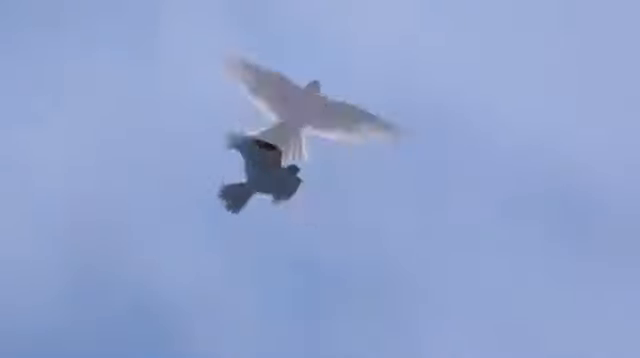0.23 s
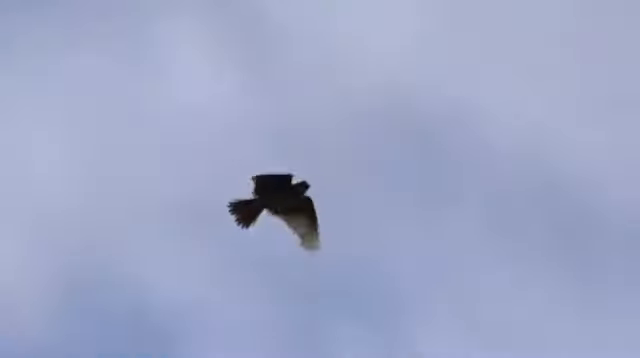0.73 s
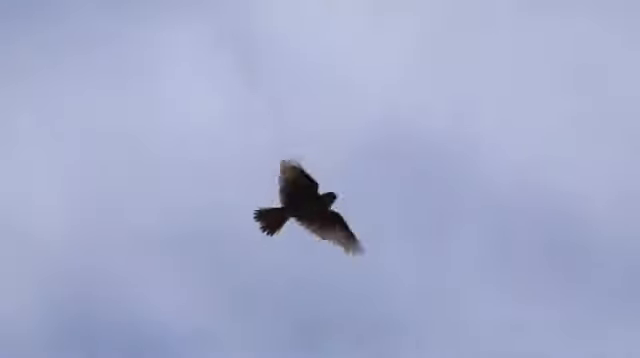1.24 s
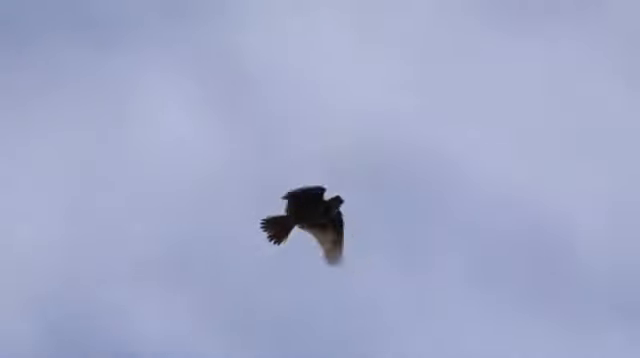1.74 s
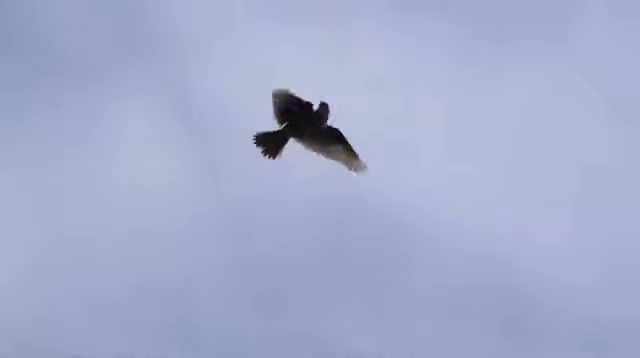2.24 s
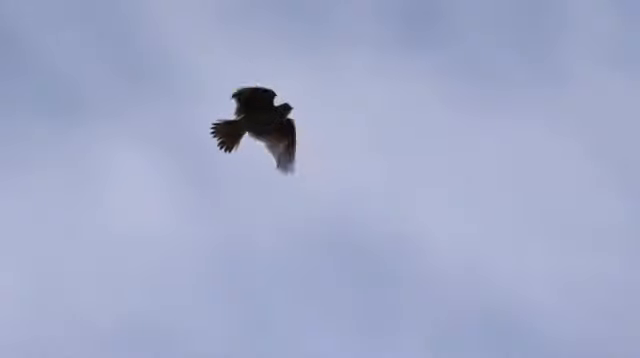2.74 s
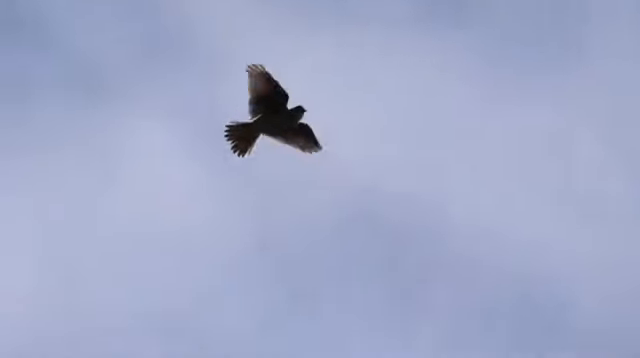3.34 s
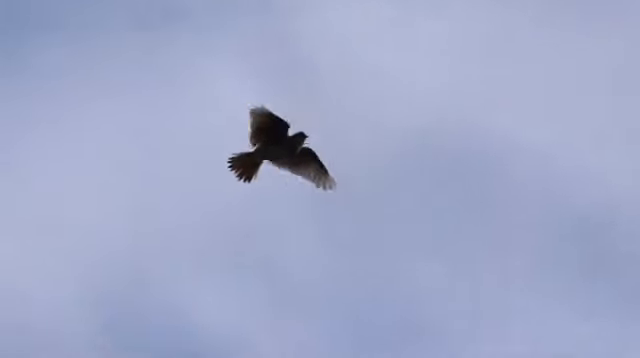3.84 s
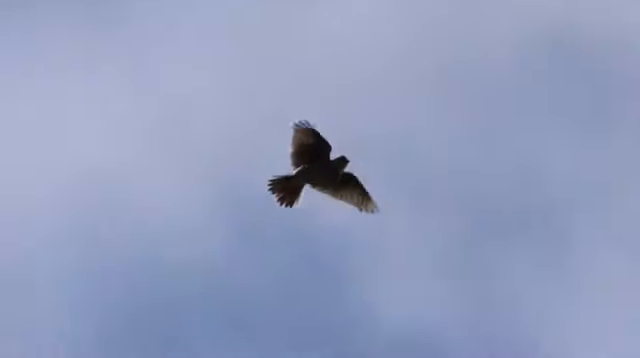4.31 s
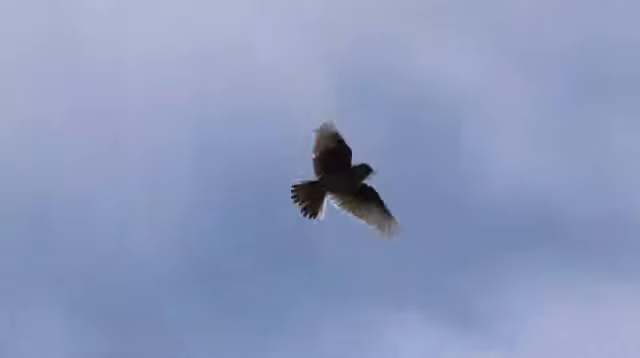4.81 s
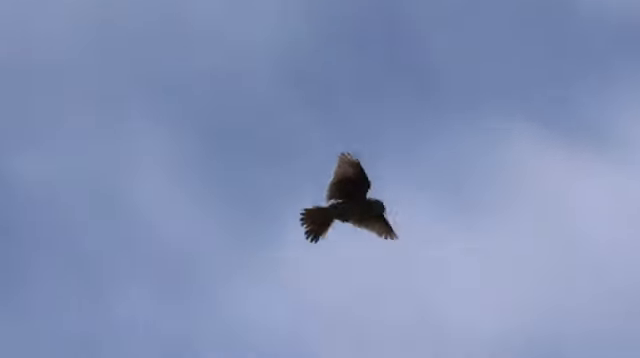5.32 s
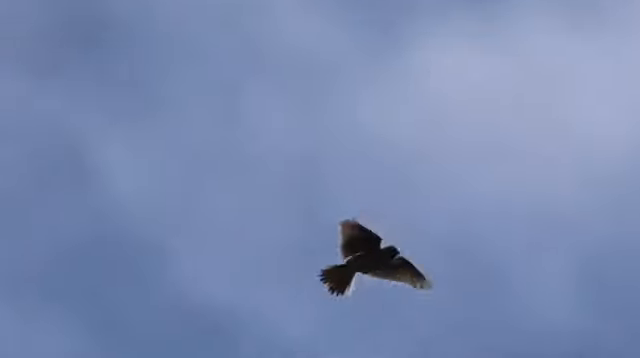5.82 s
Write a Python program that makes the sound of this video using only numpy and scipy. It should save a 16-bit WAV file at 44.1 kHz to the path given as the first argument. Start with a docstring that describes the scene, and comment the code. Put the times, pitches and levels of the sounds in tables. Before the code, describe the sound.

Outdoors over grassland, a nearby lark pours out high, clear song, with a fading blur of distant larks behind it. Repeated whistles give way to chips, warbles and two rapid trills, each on one repeated syllable and trailed by a light airy wash. The highest notes briefly turn gritty. Soft gusts rumble on the microphone, mostly at the beginning and end, above a faint hiss.

```python
"""A lark sings in flight over grassland: pure whistles, trills of one repeated syllable, quick chips and
warbles. Other larks sing farther off. Each note is a gliding, near-pure tone from the syrinx, echoed by
the ground. The tones' level wavers, a noisy wash surrounds and trails the trills, and now and then the
highest tones briefly turn to gritty noise. Wind buffets the microphone over a faint hiss; one dry tick."""
import sys
import numpy as np
from scipy import signal
from scipy.io import wavfile
from scipy.ndimage import uniform_filter1d

SR = 44100
rng = np.random.default_rng(int(sys.argv[2]) if len(sys.argv) > 2 else 0)


def int16_out(signal):
    """Quantize to a 16-bit WAV file."""
    q = np.round(np.clip(np.atleast_2d(signal).T, -1, 1) * 32767)
    wavfile.write(sys.argv[1], SR, q.astype(np.int16))


N = 267687

# syllable shapes named in the trill table: (time [ms], pitch [Hz], level [dB])
FALL = [(0, 4950, -20), (8, 4700, -13), (16.84, 4620, -7.5), (21.1, 5600, -7), (22.4, 5900, -15),
        (26.52, 5750, -27), (29.43, 4500, -2), (32.3, 3950, 2), (44.1, 2780, -11.5), (49, 2480, -29)]
PAIR = [(0, 3650, -22), (3, 3950, 1.5), (6.5, 4200, -16.5), (7.5, 3220, -12), (11, 4070, -1),
        (15, 4030, -20)]
BOW = [(0, 3450, -20), (4.5, 3720, -5), (16, 3900, -2.5), (29, 3650, -1.5), (39, 3220, -3), (46, 2700, -6),
       (53, 2080, -18)]
TURN = [(0, 5350, -26), (2, 5050, -.5), (8, 5300, -3), (11, 5350, -18), (13, 4750, -2), (16.5, 4380, -1),
        (21, 4250, -26)]


def lark_notes():
    """The near lark's whistles, slurs, warbles, chips and hooks; a noisy halo surrounds the hooks."""
    # one contour per whistle: (time [s], pitch [Hz], level [dB])
    whistles = [
        [(2.047, 2620, -23), (2.053, 2664, -26), (2.1255, 2512, -29), (2.1425, 2070, -33), (2.1575, 1630, -56)],
        [(4.249, 3000, -36), (4.256, 3130, -24), (4.2665, 3400, -19), (4.2785, 4100, -21.5),
         (4.295, 4355, -19.5), (4.387, 4702, -22.5), (4.41, 4655, -32)],
        [(5.662, 4750, -54), (5.667, 4616, -24), (5.6825, 4740, -26), (5.6855, 4420, -21), (5.69, 3426, -31),
         (5.6995, 3810.0, -23.5), (5.7035, 4150, -26), (5.7085, 2860, -30)],
    ]
    # (start [s], length [ms], first [dB], last [dB], rise [ms], fade [ms],
    # first [Hz], bend at [ms], bend [Hz], last [Hz])
    slurs = [(1.943, 30, -30, -28, 2, 3, 3250, 9, 4280, 4450),
             (1.941, 27, -50, -27.5, 1, 1, 2000, 14, 2800, 2915),
             (1.973, 72, -21, -20.5, 3, 29, 3640, 44, 3595, 3300),
             (2.377, 19, -27, -22, 6, 1, 3000, 12, 3620, 3300),
             (3.625, 20.5, -28, -29, 2, 5, 4430, 15.5, 5750, 6400),
             (3.664, 31, -33, -19.5, 3, 4.5, 5270, 26, 4910, 4850),
             (3.99, 33.5, -29, -19.5, 2, 4, 5590, 21.5, 5060, 4900),
             (5.716, 19, -27, -18, 8, 4.5, 2840, 10, 3900, 4050),
             (5.738, 18.5, -22, -21, 3, 3.5, 5000, 2.5, 4650, 4445),
             (5.76, 19, -19.5, -21, 2.5, 9, 5050, 3.5, 4510, 4450)]
    # (beat, carrier), columns as in warble()
    warbles = [ ((2.466, 44, 12, .01, .33, .05), [(2.413, 4900, -36), (2.418, 4800, -27),
               (2.434, 4500, -21), (2.466, 4395, -17), (2.55, 4310, -19), (2.632, 4235, -16),
               (2.6395, 4246, -38)]), ((3.6, 155, 200, 0.39, 0.3, 0.9), [(3.575, 4730, -37),
               (3.585, 5600, -30), (3.589, 4560, -22.5), (3.628, 4936, -29)]),
               ((3.794, 173.5, 146, .01, .97, 0), [(3.791, 5000, -34), (3.808, 5190, -21.5),
               (3.826, 5250, -21)]), ((3.8333, 141, 370, .07, 0.18, 0), [(3.827, 4960, -32),
               (3.84, 4285, -17.5), (3.866, 3624, -23.5), (3.87, 3780, -40)]),
               ((4.0609, 98.5, 592, .01, .6, 0), [(4.052, 4210, -32), (4.064, 4260, -18),
               (4.086, 4210, -20), (4.091, 4260, -36)]), ((4.4815, 95, 150, 0.46, .99, 0),
               [(4.466, 2550, -27.5), (4.481, 3330, -25), (4.496, 3800, -20.5)]),
               ((4.5905, 113.6, 30, .2, 0.99, .05, 1.2), [(4.496, 3744, -22), (4.52, 3850, -18),
               (4.62, 3895, -19.5), (4.686, 3850, -20), (4.692, 3850, -25)])]
    # (time [s], peak [dB], pitch [Hz], glide [Hz/ms], width [ms])
    chips = [(0.8287, -15.5, 4176, -250.0, 4.0), (1.5076, -17.4, 4170, -110.0, 5.0),
             (1.8448, -14.5, 3954, -230.0, 3.6), (1.8525, -21, 3950, -200, 3), (1.941, -30, 4150, 130, 4),
             (2.2195, -16.5, 3595, -7.5, 4.5), (2.4025, -19, 4030, 180, 4.4), (3.734, -20, 3850, 270, 3.4),
             (3.7489, -17.5, 3880, 190, 3.6), (4.101, -22.5, 4420, -16.5, 6.7)]
    # (start [s], count, gap [ms], first/mid/last [dB], first/mid/last [Hz], glide [Hz/ms], width [ms])
    runs = [(1.1565, 3, 7.1, (-13.5, -17, -23), (4010, 3815, 4160), -150, 3.7),
            (2.235, 3, 8.5, (-14.5, -16.5, -19), (3633, 3624, 3610), 1, 5.6),
            (2.267, 4, 9.2, (-20, -19, -17.5), (4750, 4150, 3740), -270, 2.9),
            (2.3062, 4, 10.8, (-24, -28, -36), (2920, 2560, 1950), -70, 5.5),
            (3.9024, 6, 15.65, (-24.5, -20, -24), (5710, 6150, 5960), 130, 3.2),
            (5.8218, 4, 79.3, (-19.5, -18, -18), (4170, 4120, 4090), 260, 2.8)]
    # arched whistle: (time [ms], pitch [Hz], level [dB], share of climb)
    arch_shape = [(0, 3150, -16, 0.03), (7, 4850, -7, 0.05), (12.5, 4960, -9, 0.2), (29.4, 4450, -6, 0.17),
                  (46.3, 4990, -6.5, .17), (94, 5230, -10, 0.65), (115, 5250, -11, 1),
                  (132, 5010, -9.5, 1.1), (144, 4530, -5.5, 0.9), (150, 4100, -5, 0.3),
                  (155.6, 3400, -7, -0.6)]
    # (start [s], level [dB], climb [Hz])
    arches = [(.039, -23, 820), (.348, -18, 845), (.669, -15.5, 375), (1.004, -13.5, 8), (1.35, -16.5, -10),
              (1.685, -14.5, -8)]
    # hooked syllable: (time [ms], pitch [Hz], level [dB])
    hook_shape = [(0, 3450, -14), (3, 4250, -2), (7, 4900, -2.5), (17, 5150, 0), (21, 4600, -6),
                  (26, 3550, -4), (29, 3300, -24), (31, 6300, -20), (34.5, 5950, -3), (41, 3900, -5),
                  (45, 3400, -18)]
    # (start [s], level [dB], pitch factor)
    hooks = [(0.5872, -21, 1.047), (0.924, -20, 1.037), (1.27, -25, .985), (1.604, -24, .985)]
    clear = [glide(rows) for rows in whistles] + [slur(*row) for row in slurs]
    clear += [warble(*row) for row in warbles] + [chip(*row) for row in chips]
    clear += [note for row in runs for note in chip_run(*row)]
    for start_s, level_db, climb_hz in arches:
        shape = [(ms, hz + share * climb_hz, db) for ms, hz, db, share in arch_shape]
        clear.append(syllable(shape, start_s, level_db))
    hooked = tones([syllable(hook_shape, *row) for row in hooks], waver_db=1.5, noisiness=.08)
    return tones(clear, waver_db=.45, noisiness=.0067) + hooked


def lark_trills():
    """The near lark repeats a syllable, slowing down, each repeat a little different."""
    # (shape, start [s], count, first gap [ms], gap growth [ms], first/mid/last [dB],
    # first/mid/last pitch factor, noisiness [0-1])
    trills = [(FALL, 2.6948, 11, 75.1, .68, (-17.5, -18.3, -18.4), (1.001, 1.001, 1.001), .035),
              (PAIR, 4.1134, 5, 21.5, .01, (-19, -15.5, -16.5), (1.001, 1.001, 1.001), .012),
              (BOW, 4.7415, 11, 79.9, .68, (-21, -22, -22.3), (1.092, 1.006, 1.009), .01),
              (TURN, 5.849, 3, 78.1, 1.1, (-19.6, -17.8, -18), (1.001, 1.001, 1.001), .03)]
    spread_db, spread_pitch, spread_noise_db = .7, .004, 6.5
    mix = np.zeros(N)
    for shape, start_s, count, gap_ms, growth_ms, dbs, pitches, noisiness in trills:
        k = np.arange(count)
        starts_s = start_s + (k * gap_ms + k * (k - 1) / 2 * growth_ms) / 1000
        level_jitter, pitch_jitter = rng.standard_normal((count, 2)).T
        levels_db = parabola(dbs, count) + spread_db * level_jitter
        factors = parabola(pitches, count) + spread_pitch * pitch_jitter
        notes = [syllable(shape, *row) for row in zip(starts_s, levels_db, factors)]
        mix += tones(notes, waver_db=.45, noisiness=noisiness * amp(spread_noise_db * wander(14, N)))
    return mix


def tones(notes, waver_db, noisiness=0):
    """Near-pure tones whose level wavers quickly and randomly; noisiness adds a noisy halo."""
    mix = np.zeros(N)
    for t, hz, gain in notes:
        add(mix, t[0], gain * np.sin(2 * np.pi * np.cumsum(hz) / SR))
    return mix * amp(waver_db * wander(60, N)) * (1 + noisiness * wander(750, N))


def glide(points):
    """A note (time [s], pitch [Hz], gain) drawn through points, pitch smoothed, ends tapered."""
    s, hz, db = np.transpose(points)
    t = np.arange(s[0], s[-1], 1 / SR)
    pitch_hz = uniform_filter1d(np.interp(t, s, hz), size=90, mode="nearest")
    taper = signal.windows.tukey(len(t), min(1, .0055 / (s[-1] - s[0])))
    return t, pitch_hz, np.interp(t, s, amp(db)) * taper


def syllable(shape, start_s, level_db, pitch_factor=1):
    """One repeat of a syllable shape."""
    return glide([(start_s + ms / 1000, hz * pitch_factor, level_db + db) for ms, hz, db in shape])


def slur(start_s, ms, first_db, last_db, rise_ms, fade_ms, first_hz, bend_ms, bend_hz, last_hz):
    """A short note with one bend in pitch."""
    bend_db = first_db + (last_db - first_db) * bend_ms / ms
    shape = [(0, first_hz, first_db), (bend_ms, bend_hz, bend_db), (ms, last_hz, last_db)]
    t, hz, gain = syllable(shape, start_s, 0)
    age_ms = (t - start_s) * 1000
    return t, hz, gain * np.clip(age_ms / rise_ms, 0, 1) * np.clip((ms - age_ms) / fade_ms, 0, 1)


def warble(beat, carrier):
    """A carrier (time [s], pitch [Hz], level [dB]) that swings in pitch and throbs at one rate."""
    crest_s, rate_hz, swing_hz, lag_turns, depth, uneven_turns, *sharpness = beat
    t, hz, gain = glide(carrier)
    phase = 2 * np.pi * ((t - crest_s) * rate_hz + uneven_turns * wander(rate_hz / 4, len(t)))
    throb = 1 - np.clip(depth, 0, 1) * abs(np.sin(phase / 2)) ** (2 + sum(sharpness))
    return t, hz + swing_hz * np.sin(phase + 2 * np.pi * lag_turns), gain * throb


def chip(centre_s, peak_db, hz, hz_per_ms, width_ms):
    """A bell-shaped blip on a straight glide; width at half height."""
    ms = np.arange(-1.2 * width_ms, 1.3 * width_ms, 1000 / SR)
    bell = 2 ** -(2 * ms / width_ms) ** 2
    return centre_s + ms / 1000, hz + hz_per_ms * np.clip(ms, -width_ms, width_ms), amp(peak_db) * bell


def chip_run(start_s, count, gap_ms, dbs, hzs, hz_per_ms, width_ms):
    """Evenly spaced chips drifting in level and pitch."""
    return [chip(start_s + k * gap_ms / 1000, db, hz, hz_per_ms, width_ms)
            for k, (db, hz) in enumerate(zip(parabola(dbs, count), parabola(hzs, count)))]


def far_larks():
    """Scraps of song from larks farther off."""
    # (time [s], peak [dB], pitch [Hz], glide [Hz/ms], width [ms])
    chips = [(0.048, -34, 3250, -71, 6.5), (0.221, -40, 3190, 68, 7), (0.277, -28, 5326, 8.5, 11),
             (0.299, -28.5, 6230, -150, 5.4), (.187, -25, 4500, -220, 3.2), (.565, -39, 5230, -13, 23),
             (1.316, -37, 3160, 20, 7.1), (1.482, -46, 3000, 50, 7), (.426, -40, 3200, 40, 6),
             (.447, -47, 2750, 40, 6), (4.21, -50, 5600, -9, 22)]
    # (start [s], count, gap [ms], first/mid/last [dB], first/mid/last [Hz], glide [Hz/ms], width [ms])
    runs = [(.228, 4, 34, (-49, -53, -49), (2350, 2280, 2300), 15, 7), (.164, 3, 15.5, (-50, -49, -52),
            (2450, 2050, 2250), -15, 6), (.418, 5, 17.5, (-37, -39, -38), (4100, 4200, 4250), 70, 4.5),
            (.112, 4, 12, (-39, -38, -41), (3600, 3500, 3300), -60, 5), (1.026, 4, 18, (-34, -38, -42),
            (3090, 3030, 3100), -5, 8), (1.197, 5, 23.6, (-40, -32, -37), (3090, 2930, 3000), 3, 8),
            (1.742, 4, 24.5, (-45, -40, -40), (3850, 3780, 3850), 45, 8)]
    # (beat, carrier), columns as in warble()
    warbles = [ ((.11, 173.5, 195, .01, .9, 0.12), [(.058, 4600, -30), (.072, 4580, -23), (.09, 4710, -27),
               (.16, 4724, -28)]), ((.3, 110, 340, .0, .8, 3), [(.24, 3460, -31), (.255, 3900, -27),
               (.31, 3950, -26.5), (.335, 3800, -52), (.35, 3980, -25), (.385, 3920, -49)])]
    notes = [warble(*row) for row in warbles] + [chip(*row) for row in chips]
    notes += [note for row in runs for note in chip_run(*row)]
    return tones(notes, waver_db=1.2)


def echoes_and_wash(song, wash_db, t60_s, blur):
    """Adds two ground echoes and a noisy wash with a duller tail; blur makes both flicker."""
    # ground echoes: (delay [ms], level [dB])
    echoes = [(5.5, -17), (11.5, -16.5)]
    early_db, early_t60_s, dull_hz, dull_db = 4, .09, 2600, 5
    t = np.arange(SR // 2) / SR
    early, late = amp(early_db - 60 * t / early_t60_s), amp(-60 * t / t60_s)
    bright = rng.standard_normal((3, len(t))) * np.minimum(t / .0041, 1)
    dull = signal.sosfilt(signal.butter(2, dull_hz, fs=SR, output="sos"), bright)
    taps = bright * (late + early) + amp(dull_db) * dull * late
    taps = taps[0] + .076 * taps[1:]  # common part plus a little per ear
    taps *= amp(wash_db) / np.linalg.norm(taps[0])
    for ms, db in echoes:
        taps[:, round(ms * SR / 1000)] += amp(db)
    wet = signal.fftconvolve(song[None], taps, axes=1)[:, :N] * (1 + blur * wander(311, N))
    song_band = signal.butter(3, [1500, 7200], "bandpass", fs=SR, output="sos")
    return signal.sosfilt(song_band, song + wet)


def gritty_highs(song):
    """The highest tones briefly turn to noise, smeared in pitch and time, different in each ear."""
    # (start [s], length [ms], share [0-1])
    patches = [(.155, 33, .7), (.249, 79, .6), (1.13, 26, .9), (1.269, 59, .95), (1.621, 32, .9),
               (1.935, 38, .4), (2.25, 45, .6), (2.917, 32, .85), (2.992, 24, .7), (3.079, 26, .85),
               (3.595, 76, .75)]
    above_hz, width_hz, smear_ms = 4100, 250, 24
    t = np.arange(N) / SR
    share = sum(np.clip(part, 0, 1) * ((t > s) & (t < s + ms / 1000)) for s, ms, part in patches)
    share = uniform_filter1d(share, size=200)
    top = signal.sosfiltfilt(signal.butter(8, above_hz, "highpass", fs=SR, output="sos"), song)
    grit = share * top * np.array([wander(width_hz, N) for ear in song])
    smear = rng.standard_normal((2, round(smear_ms * SR / 1000)))
    grit = signal.oaconvolve(grit, smear / np.sqrt(smear.shape[1]), "same", axes=1)
    return song + top * (np.sqrt(abs(1 - share ** 2)) - 1) + 1.3 * grit


def wind():
    """Buffeting on the microphone: deep and upper rumble, and a flutter that bursts out in puffs."""
    # deep rumble: (time [s], level [dB])
    gusts = [(0, -39), (.17, -38), (.27, -47), (.74, -45), (.81, -56), (1.02, -42), (1.25, -53),
             (1.57, -69), (1.9, -49), (2.08, -74), (2.32, -65), (2.38, -50), (2.55, -52), (2.74, -73),
             (2.8, -59), (3.18, -77), (3.28, -51), (3.5, -49), (3.74, -67), (3.79, -51), (4.16, -61),
             (4.26, -45), (4.37, -57), (4.82, -57), (5.0, -70), (5.09, -54), (5.36, -48), (5.5, -57),
             (6.07, -36)]
    # upper rumble relative to deep: (time [s], level [dB])
    upper_offset = [(0, -1), (1.1, -.5), (1.4, -9), (5.1, -9), (5.3, -.5)]
    # (time [s], level [dB], 1/e half-width [ms])
    puffs = [(.1, -49, 173), (0.661, -52.5, 32), (1.018, -53, 14), (5.343, -45, 14), (5.391, -50, 12),
             (5.63, -47, 24), (5.733, -47, 13)]
    # spectra: (frequency [Hz], density [dB])
    rumble_colour = [(20, -24), (50, -15), (104, -.5), (118, -2), (206, -6.5), (334, -20.5), (600, -50)]
    flutter_colour = [(150, -26.5), (300, 4.5), (600, -3.5), (900, -13), (1300, -33)]
    split_hz = 170
    t = np.arange(N) / SR
    deep_db = curve(gusts) + 3.2 * wander(16, N)
    upper_db = deep_db + curve(upper_offset)
    puff_gain = sum(amp(db) * np.exp(-((t - s) * 1000 / ms) ** 2) for s, db, ms in puffs)
    rumble = noise(rumble_colour, correlation=1, patchy_db=1.5, fft_size=2048)
    deep = signal.sosfiltfilt(signal.butter(3, split_hz, fs=SR, output="sos"), rumble)
    flutter = noise(flutter_colour, correlation=1, patchy_db=3.5)
    flutter *= amp(upper_db - 19) + puff_gain + amp(-79)
    return evened(deep) * amp(deep_db) + evened(rumble - deep) * amp(upper_db) + flutter


def chorus():
    """A fading blur of distant song, as patchy noise."""
    # (time [s], level [dB])
    levels = [(0, -43), (.5, -46), (1.3, -55.5), (2.3, -69.5)]
    # (frequency [Hz], density [dB])
    colour = [(1500, -32.5), (2200, -9.5), (4800, 15), (5900, -2), (7500, -44.5)]
    return amp(curve(levels)) * noise(colour, correlation=.8, patchy_db=5.5)


def hiss():
    """Air and microphone hiss, falling early on."""
    # (time [s], level [dB])
    levels = [(0, -54.5), (.8, -56), (1.1, -61), (2.5, -65.5), (6.07, -65)]
    # (frequency [Hz], density [dB])
    colour = [(300, -11), (700, .8), (1300, -13), (2200, 0), (13000, 1.5)]
    return amp(curve(levels)) * noise(colour, correlation=.05, patchy_db=4)


def tick(start_s=2.1336, level_db=-27):
    """One dry tick, dying within a few samples."""
    mix = np.zeros(N)
    add(mix, start_s, amp(level_db) * np.exp(-np.arange(40) / 2))
    return mix


def noise(colour, correlation, patchy_db, fft_size=512):
    """Coloured stereo noise in drifting patches, rms 1."""
    frames, hz = 4 * N // fft_size + 5, np.fft.rfftfreq(fft_size, 1 / SR)
    re, im, other_re, other_im, patches = rng.standard_normal((frames, len(hz), 5)).T
    patches = evened(uniform_filter1d(uniform_filter1d(patches, size=8, axis=0), size=10, axis=1))
    left = re + 1j * im
    right = correlation * left + np.sqrt(1 - correlation ** 2) * (other_re + 1j * other_im)
    knots_hz, knots_db = np.transpose(colour)
    colour_db = np.interp(np.log(hz + 1), np.log(knots_hz + 1), knots_db, -90, -90)
    spectra = np.array([left, right]) * amp(colour_db[:, None] + patchy_db * patches)
    return evened(signal.istft(spectra, nperseg=fft_size, noverlap=3 * fft_size // 4)[1][:, :N])


def wander(rate_hz, samples):
    """Low-passed random drift, rms 1."""
    sos = signal.butter(4, min(rate_hz, 2000) / (SR / 2), output="sos")
    return evened(signal.sosfilt(sos, rng.standard_normal(samples + 4000))[4000:])


def parabola(values, count):
    """Points on a parabola through first, middle and last value."""
    return np.polyval(np.polyfit([0, .5, 1], values, 2), np.linspace(0, 1, count))


def curve(points):
    """(time [s], value) interpolated over all samples."""
    return np.interp(np.arange(N) / SR, *np.transpose(points))


def amp(db):
    """Decibels to gain."""
    return 10 ** (np.asarray(db) / 20)


def evened(x):
    """Scales to rms 1."""
    return x / np.sqrt(np.mean(x ** 2) + 1e-20)


def add(mix, start_s, sound):
    """Mixes a sound in at start_s."""
    part = mix[round(start_s * SR):][:len(sound)]
    part += sound[:len(part)]


def scene():
    """Larks over grassland, with hiss, chorus, tick and wind."""
    song = echoes_and_wash(lark_notes(), wash_db=-17, t60_s=.27, blur=.35)
    # a noisy wash surrounds and trails the trills
    song += echoes_and_wash(lark_trills(), wash_db=-13.5, t60_s=.38, blur=.4)
    song += echoes_and_wash(far_larks(), wash_db=-10, t60_s=.14, blur=.16)
    background = hiss() + chorus() + tick()
    return gritty_highs(song) + wind() + background


def record(dry):
    """The recorder's band limit."""
    cutoff_hz = 13200
    lowpass = signal.firwin(511, cutoff_hz, window=("kaiser", 9), fs=SR)
    return signal.oaconvolve(dry, lowpass[None], "same")


dry = scene()
out = record(dry)
int16_out(out)
```